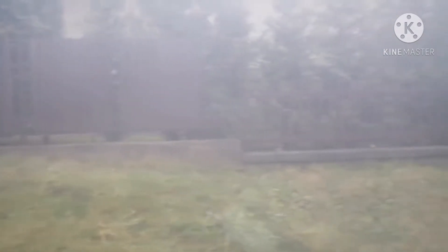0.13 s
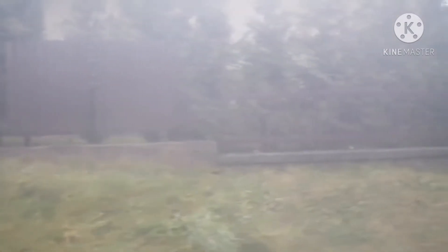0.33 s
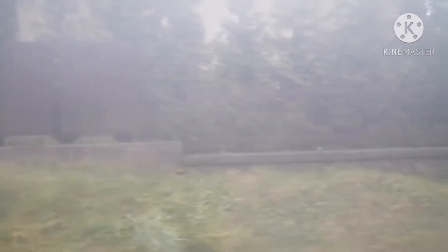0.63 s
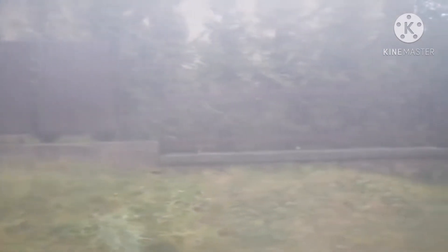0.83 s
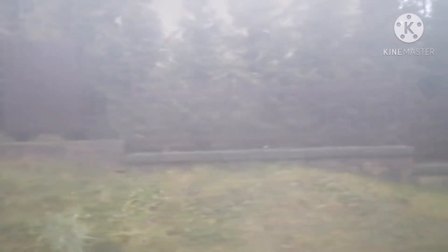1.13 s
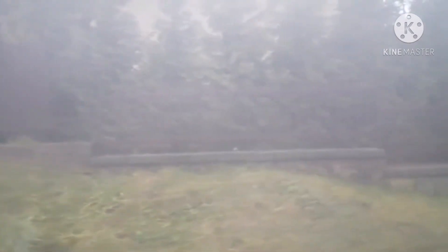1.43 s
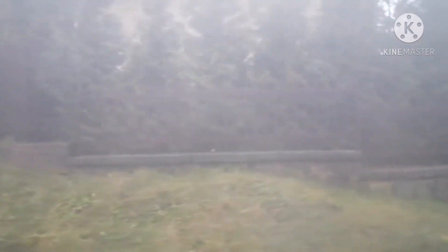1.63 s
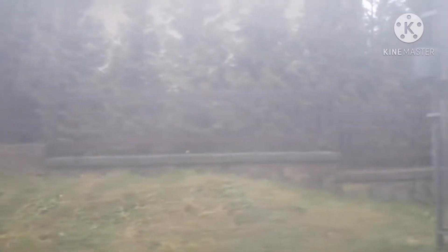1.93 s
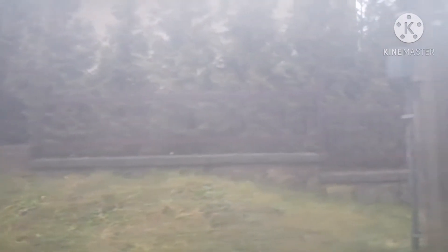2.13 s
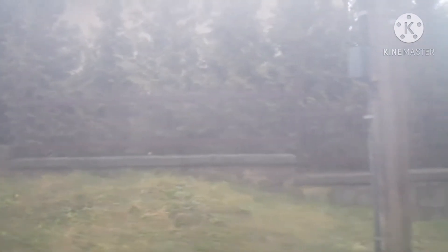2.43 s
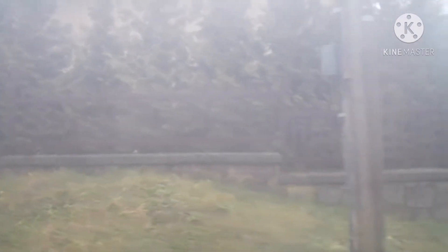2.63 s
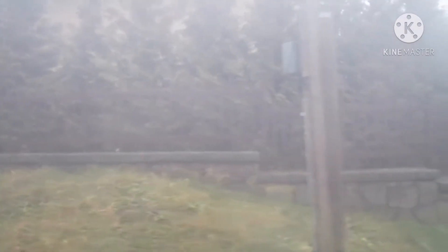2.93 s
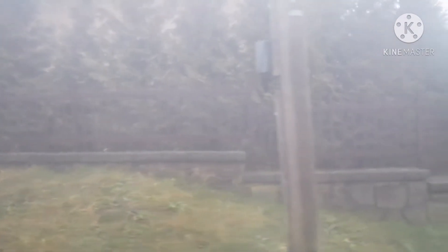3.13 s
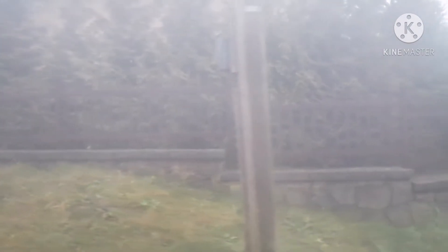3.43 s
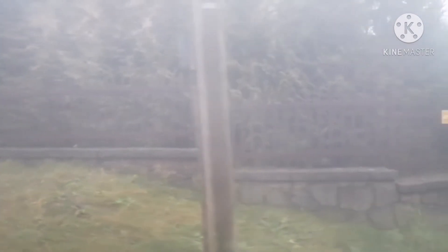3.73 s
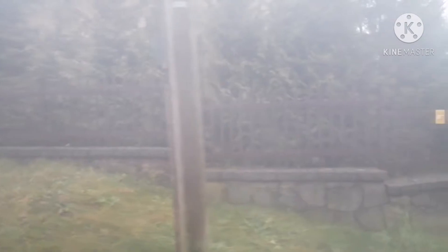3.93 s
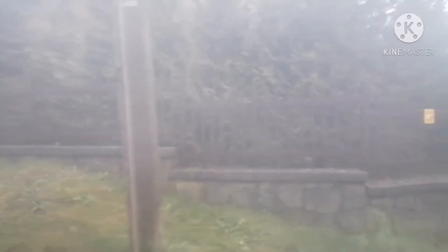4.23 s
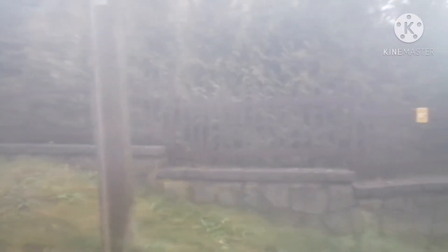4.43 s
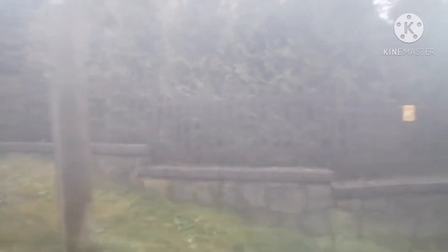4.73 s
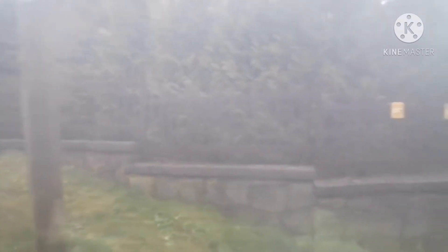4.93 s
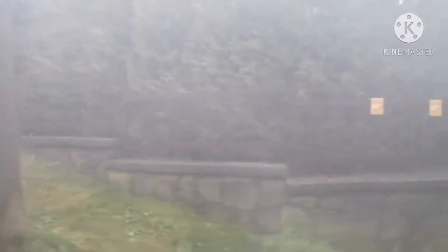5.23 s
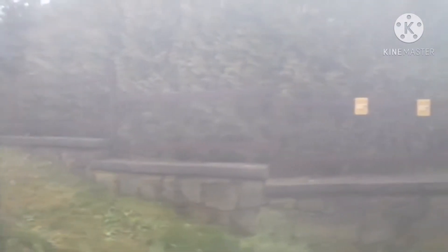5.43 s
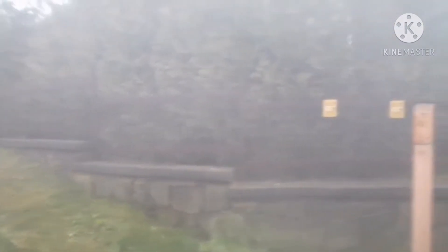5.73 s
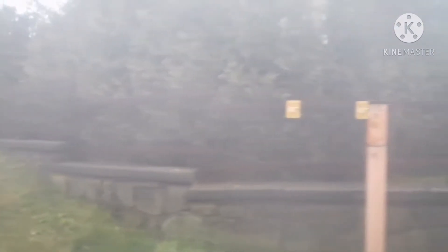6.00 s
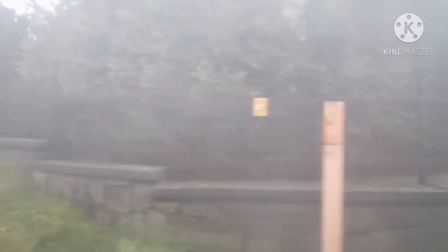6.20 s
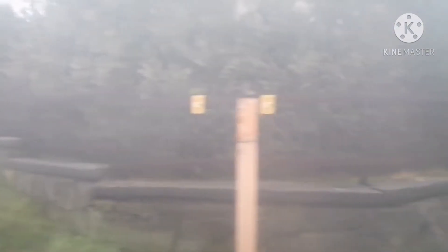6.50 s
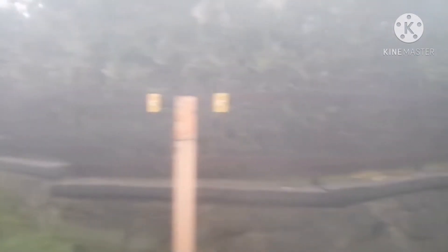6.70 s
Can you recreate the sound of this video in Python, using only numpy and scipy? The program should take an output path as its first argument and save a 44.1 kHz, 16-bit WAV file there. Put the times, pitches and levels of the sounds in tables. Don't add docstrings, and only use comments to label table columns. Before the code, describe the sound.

Inside a bus, a low diesel engine booms and road roar rumbles, with squeaks and short air puffs, then the engine pulls harder.

```python
import sys
import numpy as np
from scipy import signal
from scipy.fft import rfft, irfft
from scipy.io import wavfile
from scipy.ndimage import uniform_filter1d

SR = 44100
rng = np.random.default_rng(int(sys.argv[2]) if len(sys.argv) > 2 else 0)


def gain_from_db(level_db):
    decades = np.asarray(level_db, float) / 20
    return 10 ** decades


def transcribe(u):
    v = np.clip(np.atleast_2d(u).T, -1, 1)
    q = np.round(v * 32767).astype(np.int16)
    wavfile.write(sys.argv[1], SR, q)


N = 302526
TIME = np.arange(N) / SR


def evened(x):
    return x / np.sqrt(np.mean(x ** 2) + 1e-20)


def read(points, hz):
    point_hz, value = np.transpose(points)
    return np.interp(np.log(hz + 1), np.log(point_hz + 1), value)


def curves(rows, t):
    start_s, *columns = np.transpose(rows)
    return [np.interp(t, start_s, column) for column in columns]


def drift(rate_hz, size):
    knots = rng.standard_normal((int(N / SR * 40) + 2, size))
    place = TIME * min(rate_hz, 39)
    return 0.92 * np.array([np.interp(place, np.arange(len(knots)), k) for k in knots.T])


def spell(t, start_s, end_s, edge_s):
    return np.clip(np.minimum(t - start_s, end_s - t) / edge_s + 0.5, 0, 1)


def sides(x, pan_db):
    return x * gain_from_db(np.array([[0.5], [-0.5]]) * pan_db)


def add(mix, start_s, sound):
    part = mix[:, max(round(start_s * SR), 0):][:, :sound.shape[1]]
    part += sound[:, :part.shape[1]]


def tones(turns, levels_db, waver_db, waver_hz):
    total = 0
    for phase, db, waver in zip(turns, levels_db, drift(waver_hz, size=len(turns))):
        strength = np.sqrt(2) * gain_from_db(db + waver_db * waver)
        total = total + strength * np.sin(2 * np.pi * (phase + rng.random()))
    return total


# start_s, firing_hz, throttle_db
ENGINE = [(0.0, 31.32, -10.5), (1.5, 30.14, -8.5), (2.7, 29.0, -10.5), (3.0, 29.61, -9.5),
          (3.95, 29.92, -7), (4.08, 35.04, -7.5), (4.22, 36.92, -9), (4.3, 37.36, -14.5), (4.37, 37.56, -1),
          (4.67, 38.23, 1.5), (5.05, 37.92, -1.5), (5.18, 36.49, -1), (5.26, 35.9, -19), (5.58, 36.4, -9),
          (5.78, 39.52, 4), (6.08, 46.56, 0), (6.6, 51.56, 3), (6.86, 58.9, -4)]
# order, level_db, share of the throttle swing
STRONG_ORDERS = [(1, 1, 0.78), (1.5, -8.5, 0.39), (2, 0, 0.97)]
# order, level_db at idle
WEAK_ORDERS = [(.5, -50), (2.5, -43), (3, -44), (4, -50), (6, -50), (8, -50)]
# hz, level_db
FLOOR = [(32, -29.5), (39, -40.5), (45, -28), (58, -28), (77, -19.5), (88, -37.5), (98, -26.5),
         (108, -48.5)]
PUMP_DB = [-42, -43, -53]
# partial, start_s, end_s, swell_db
SINGING = [
    (3, -.2, 1.22, 12),
    (2, 4.02, 5.17, 8.5),
    (2, 5.27, 5.55, 8),
    (1, 4.05, 4.2, 5),
    (1, 4.66, 4.95, 6),
]


def engine():
    firing_hz, throttle_db = curves(ENGINE, TIME)
    turns = np.cumsum(firing_hz) / SR
    strong_db = [db + read(FLOOR, k * firing_hz) + share * throttle_db for k, db, share in STRONG_ORDERS]
    strong = tones([k * turns for k, _, _ in STRONG_ORDERS], strong_db, waver_db=2.5, waver_hz=9)

    fade_db = -0.3 * (firing_hz - 30)
    weak_db = [db + fade_db for _, db in WEAK_ORDERS]
    weak = tones([k * turns for k, _ in WEAK_ORDERS], weak_db, waver_db=6, waver_hz=5.6)

    tooth_hz = 5.8 * firing_hz * (1 + 0.0045 * drift(25, size=1)[0])
    teeth = np.cumsum(tooth_hz) / SR
    pump_db = []
    for partial, db in enumerate(PUMP_DB, 1):
        swell_db = sum(swell * spell(TIME, a, b, edge_s=0.091) for n, a, b, swell in SINGING if n == partial)
        pump_db.append(db + swell_db)
    pump = tones([k * teeth for k in (1, 2, 3)], pump_db, waver_db=2.2, waver_hz=14)

    left, right = sides(strong + weak, pan_db=5.5) + sides(pump, pan_db=-1.0)
    return np.array([np.roll(left, shift=20), right])


# start_s, length_s, low_swell_db, middle_swell_db
JOLTS = [
    (0.498, 0.9, 0, 1),
    (2.795, 0.13, 3.5, -0.5),
    (4.096, .2, 0.5, -1),
    (4.875, 0.061, 1.5, 0.5),
    (5.176, 0.056, 4.5, 1),
    (5.312, 0.067, 5, -0.5),
    (5.371, .07, 1.5, 4),
    (5.976, 0.35, 2, 3.5),
    (6.406, 0.087, 4.5, -2),
    (6.655, 0.067, -2.5, 2),
]


def swells(t):
    speed_hz = curves(ENGINE, t)[0] - 30
    low_db, mid_db = -0.5 + 0.26 * speed_hz, 3.0 + 0.31 * speed_hz
    for start_s, length_s, low, mid in JOLTS:
        bump = np.exp(-(2 * (t - start_s) / length_s) ** 2)
        low_db, mid_db = low_db + low * bump, mid_db + mid * bump
    return low_db, mid_db


# hz, left_right_likeness
SAME = [(25, .99), (60, .97), (130, .78), (290, .74), (600, .55), (900, .4), (1300, .2), (15000, .1)]
# hz, lead_radians
LEAD = [(60, 0.15), (150, 0), (300, -.2), (560, -0.25), (850, -2.3), (1200, -3.8), (3000, -7), (15000, -8)]
# hz, lean_db
LEAN = [(60, -2), (110, 7.5), (200, 9), (380, 2), (700, -1.5), (1290, -2), (2380, 1.5), (4400, -4),
        (8120, 1.5), (15000, -0.5)]


def field(level_db, size, patchy_db):
    frames, hz = 4 * N // size + 5, np.fft.rfftfreq(size, 1 / SR)[:, None]
    a, b, c, d, patches = rng.standard_normal((frames, len(hz), 5)).T
    patches = uniform_filter1d(patches, size=6, axis=0)
    patches = evened(uniform_filter1d(patches, size=8, axis=1))
    same = np.clip(read(SAME, hz), -1, 1)
    lean = gain_from_db(read(LEAN, hz) / 2)
    left = a + 1j * b
    right = same * left + np.sqrt(1 - same ** 2) * (c + 1j * d)
    z = np.array([left * lean * np.exp(1j * read(LEAD, hz)), right / lean])
    frame_s = np.arange(frames) * size / 4 / SR
    z *= gain_from_db(level_db(hz, frame_s) + patchy_db * patches)
    return signal.istft(z, nperseg=size, noverlap=3 * size // 4)[1][:, :N]


# hz, level_db per Hz
IDLE = [(8.8, -33), (15, -17), (54, -8), (75, -6.5), (118, -1.5), (232, 0), (333, -5.5), (386, -9.5),
        (520, -14), (796, -17.5), (885, -20), (1090, -26), (1190, -30), (1540, -28.5), (2400, -41.5),
        (3120, -72.5), (5280, -120)]
# hz, width_hz, level_db, feed (how strongly the swell of speed and jolts drives the mode)
CABIN = [(45.7, 36, -38.5, 1.2), (75.5, 4.4, -47, 2.6), (189, 13, -50.5, 2.5), (221, 7.6, -38, 1.15),
         (312, 22, -42.5, 1), (429, 45, -49.5, 1.55), (516, 37, -49.5, 1.59), (780, 53, -56, 0.96),
         (1087, 72, -51.5, 0.73), (1249, 50, -62, 0.96), (1540, 93, -57, -0.93), (2180, 170, -77.5, 2.1)]


def roar():
    lurch_db = 1.0 * drift(8, size=2)

    def level_db(hz, t):
        low_db, mid_db = (s + np.interp(t, TIME, u) for s, u in zip(swells(t), lurch_db))
        mid_share = np.clip(np.log2((hz + 1) / 300), 0, 1)
        swell_db = (1 - mid_share) * low_db + mid_share * mid_db
        reach = np.clip(1.1 - hz / 3000, 0, 1)
        power = gain_from_db(read(IDLE, hz) - 54.5 + reach * swell_db) ** 2
        for mode_hz, width_hz, db, feed in CABIN:
            bell = 1 / (1 + (2 * (hz - mode_hz) / width_hz) ** 2) ** 1.43
            power += gain_from_db(db + feed * swell_db) ** 2 / width_hz * bell
        return 10 * np.log10(power) + 11.28
    return field(level_db, size=4096, patchy_db=1.5)


def air(length_s, bright_db):
    size = round(length_s * SR)
    hz = np.fft.rfftfreq(size, 1 / SR)
    colour = gain_from_db(read(FANS, hz) + bright_db * np.log2((hz + 1) / 6000))
    return evened(irfft(rfft(rng.standard_normal((2, size))) * colour, size))


# start_s, length_s, level_db, brightness_db per
# octave, left_right_db
PUFFS = [
    (0, 0.02, -67, 0.5, 13),
    (1.342, 0.17, -65, 7.5, -4),
    (1.408, .075, -54.5, 2, -0.5),
    (1.778, 0.18, -59, 1.5, -6),
    (3.449, .09, -55.5, 3.5, -5),
    (4.801, .17, -59, 3.5, 2.5),
    (5.796, 0.054, -78, 4.5, -4.5),
    (6.098, 0.66, -64.5, 6.5, -5),
    (6.447, .15, -50, -1, -4.5),
]
# start_s, peak_db, left_right_db, crack_t60_s
TICKS = [
    (4.756, -39, -5, 0.018),
    (4.856, -34, -3, 0.022),
    (4.9343, -30, 17, 0.02),
    (6.107, -36.5, 3.5, 0.02),
    (6.564, -37, 8, 0.025),
]


def valves():
    out = np.zeros((2, N))
    for start_s, length_s, db, bright_db, pan_db in PUFFS:
        puff = air(length_s, bright_db)
        puff = gain_from_db(db) * puff * signal.windows.tukey(puff.shape[1], 0.4)
        add(out, start_s, sides(puff, pan_db))

    t = np.arange(2000) / SR
    u = t - 0.0013
    ring = np.sin(2 * np.pi * 5800 * u) + 0.22 * np.sin(2 * np.pi * 11500 * u)
    snap = np.exp(-(u / 0.00023) ** 2) * ring
    for start_s, db, pan_db, crack_s in TICKS:
        crack = gain_from_db(-60 * t / crack_s) * np.minimum(t / 0.0008, 1)
        rattle = gain_from_db(-17 - 60 * t / 0.045)
        strike = np.clip((db + 36) / 6, 0, 1)
        tick = gain_from_db(-6 - 4 * strike) * air(2000 / SR, bright_db=5) * (crack + rattle)
        tick = tick + 0.9 * strike * snap
        add(out, start_s, sides(gain_from_db(db) * tick, pan_db))
    return out


def whistle(hz, width_hz, size, same=0.):
    r = np.exp(-np.pi * width_hz / SR)
    a, b = rng.standard_normal((2, 2, size + 4000))
    slow = signal.lfilter([1], [1, -r], a + 1j * b)
    slow = signal.lfilter([1], [1, -r], slow)[:, 4000:]
    slow[1] = same * slow[0] + np.sqrt(1 - min(same ** 2, 1)) * slow[1]
    turns = np.cumsum(hz * np.ones(size)) / SR
    return evened((slow * np.exp(2j * np.pi * turns)).real)


# start_s, length_s, pitch_hz, width_hz, level_db
SQUEAKS = [
    (1.340, .1, 2910, 120, -41),
    (1.337, 0.14, 7180, 240, -45.5),
    (1.339, .1, 5260, 670, -51),
    (1.442, .06, 5320, 200, -51),
    (2.785, 0.039, 141, 17, -21),
    (3.451, .075, 6760, 300, -58),
    (3.452, 0.087, 5170, 390, -53.5),
    (3.5, 0.55, 5300, 700, -59),
]
# start_s, length_s, pitch_hz, width_hz, level_db
RUBS = [
    (0.59, 2.4, 7745, 9, -75),
    (4.82, .14, 5470, 800, -53.5),
    (4.85, .07, 780, 43, -42.5),
    (5.281, 0.2, 1082, 70, -45.5),
    (5.63, .26, 1580, 60, -52),
    (6.25, 0.91, 14500, 600, -76),
    (5.3, 0.038, 7850, 60, -71),
    (6.75, .1, 5540, 73, -62),
]
# start_s, length_s, pitch_hz, width_hz, level_db
SQUEAL = [
    (6.09, .65, 8700, 140, -58),
    (6.02, .56, 10860, 80, -72),
    (6.1, .36, 13000, 2500, -70),
]


def squeaks():
    out = np.zeros((2, N))
    for rows, fade_db in ((SQUEAKS, -18), (RUBS, -1.0)):
        for start_s, length_s, hz, width_hz, db in rows:
            size = round(length_s * SR)
            shape = gain_from_db(db + np.linspace(0, fade_db, size)) * signal.windows.tukey(size, 0.1)
            add(out, start_s, shape * whistle(hz, width_hz, size, same=min(read(SAME, hz), 1)))
    for (start_s, length_s, hz, width_hz, db), grip in zip(SQUEAL, drift(20, size=3)):
        size = round(length_s * SR)
        chatter_db = 3 * grip[:size]
        shape = gain_from_db(db + np.linspace(0, -3, size) + chatter_db) * signal.windows.tukey(size, 0.2)
        add(out, start_s, shape * whistle(hz, width_hz, size, same=-0.3))
    return out


# hz, level_db per Hz
FANS = [(1060, -23.5), (1800, -6), (2520, -6.5), (2730, -3), (3100, -5), (4030, -17.5), (5110, -9),
        (5960, -10), (6890, -5.5), (7890, -17), (8110, -18), (9040, -23.5), (14600, -28.5), (15300, -30),
        (15700, -47)]


def fans():
    def level_db(hz, t):
        return read(FANS, hz) + 0.079 * swells(t)[1]
    return gain_from_db(-56.5) * evened(field(level_db, size=512, patchy_db=1.0))


def scene():
    return engine() + roar() + valves() + squeaks() + fans()


def roll_off(x):
    return signal.sosfilt(signal.butter(12, 15300, fs=SR, output="sos"), x)


def record(dry):
    end_fade = np.minimum((TIME[-1] - TIME) / 0.002 + 0.25, 1)
    return roll_off(dry * end_fade)


dry = scene()
out = record(dry)
transcribe(out)
```